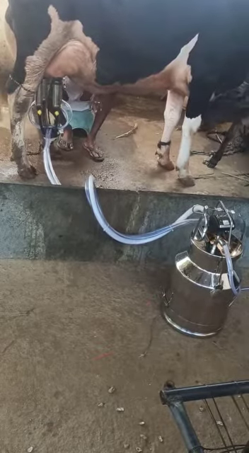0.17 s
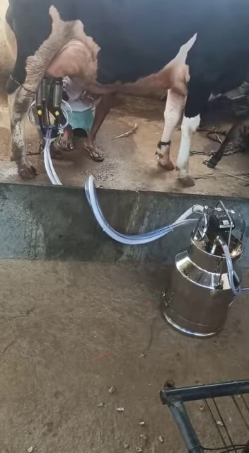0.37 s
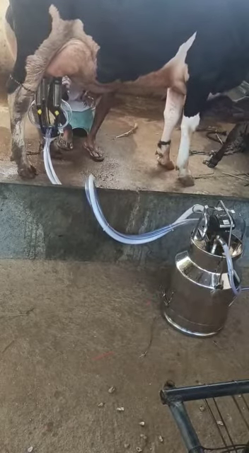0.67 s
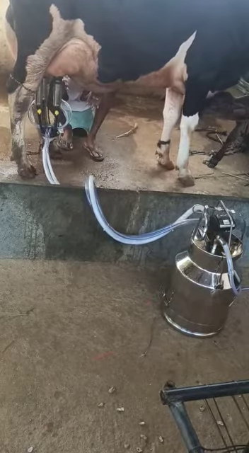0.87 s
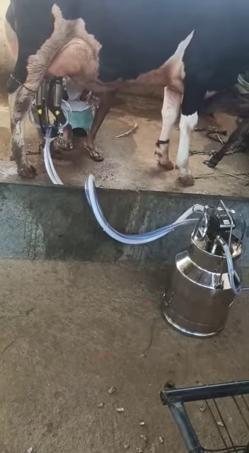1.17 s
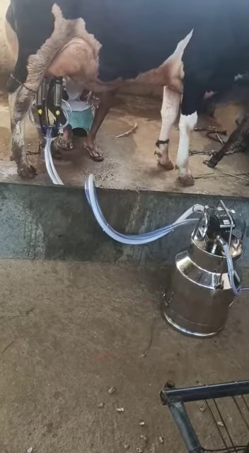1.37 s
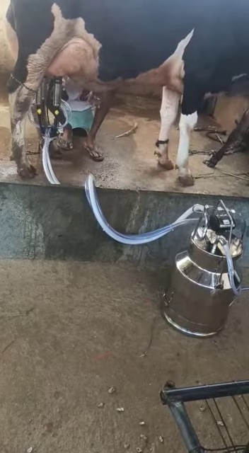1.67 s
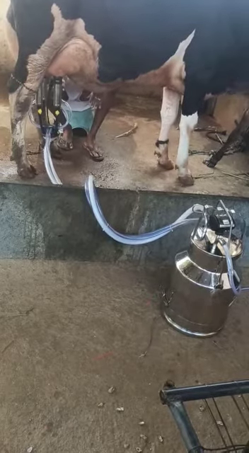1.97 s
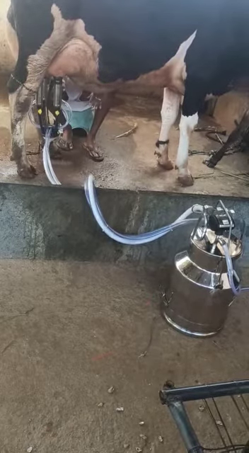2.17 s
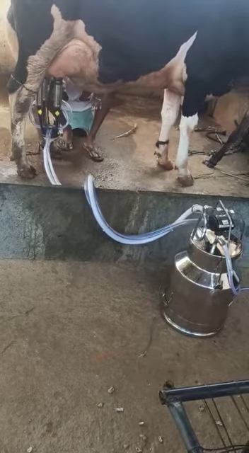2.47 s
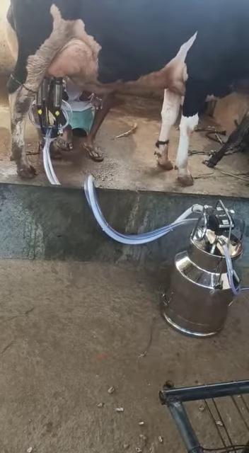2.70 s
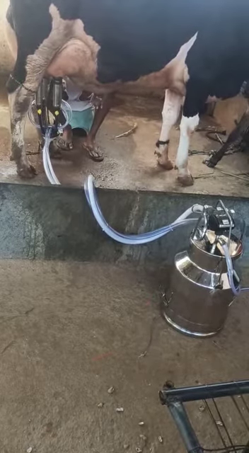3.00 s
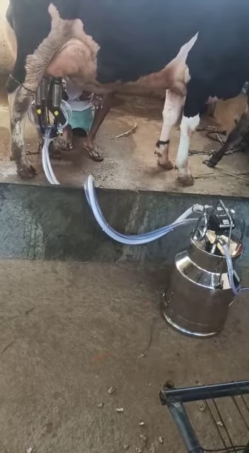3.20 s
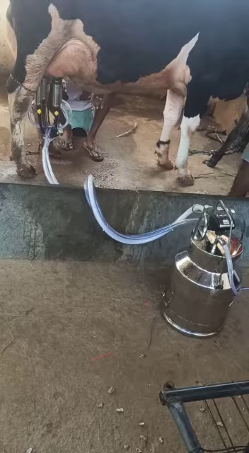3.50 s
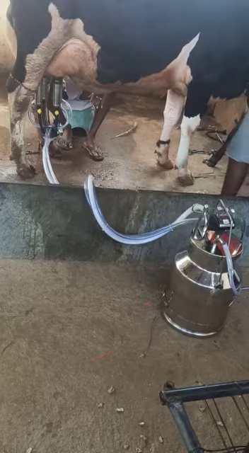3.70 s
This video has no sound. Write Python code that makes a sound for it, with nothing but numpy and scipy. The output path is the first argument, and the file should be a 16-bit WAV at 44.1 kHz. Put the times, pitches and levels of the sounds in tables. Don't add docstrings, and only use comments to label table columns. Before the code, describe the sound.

Milking machine running in a barn: droning pump, rushing air, sharp alternating clicks and soft air puffs.

```python
import sys
import numpy as np
from scipy import signal
from scipy.fft import rfft, irfft, next_fast_len
from scipy.io import wavfile
from scipy.ndimage import uniform_filter1d, map_coordinates

SR = 44100
rng = np.random.default_rng(int(sys.argv[2]) if len(sys.argv) > 2 else 0)


def ratio(d):
    e = np.asarray(d, float) / 20
    return 10 ** e


def wav_out(sig):
    wavfile.write(sys.argv[1], SR, np.round(np.clip(np.atleast_2d(sig).T, -1, 1) * 32767).astype(np.int16))


N = 169785

SHAFT_HZ = 47.537


def pump():
    # freq_hz, density_db
    rumble = [(25, -40), (70, -29), (95, -11), (230, -7.5), (310, -1.5), (480, -9), (600, -10.5),
              (1400, -16.5)]
    rush = [(600, -23), (1300, -22.5), (2060, 1), (2200, 0), (2500, 0.5), (4300, -3), (6300, -1.5),
            (6950, -6.5)]
    fizz = [(6800, -37), (7450, 10), (7900, 1), (8250, 9.5), (11900, 0.5), (13500, -4), (15500, -15)]
    rumble_db, rush_db, fizz_db = -35.5, -33.5, -37
    vane_depth, surge_db, surge_rate_hz = 0.047, 0.8, 5.86
    t = np.arange(N) / SR
    vane = 1 + vane_depth * np.cos(2 * np.pi * 4 * SHAFT_HZ * t)
    swing = np.interp(t * 200, np.arange(800), wobble(surge_rate_hz, count=1)[0])
    surge = ratio(surge_db * swing)
    out = tones() + ratio(rumble_db) * air(rumble, patchy_db=4.0, size=1)
    out += ratio(rush_db) * surge * vane * air(rush, patchy_db=1.4)
    return out + ratio(fizz_db) * surge * air(fizz, patchy_db=2.0)


def tones():
    # shaft_order, left_db, right_db, left_lead_rad
    strong_orders = [(4, -31.6, -31.3, 0), (8, -36, -42, -0.1), (10, -47, -46, -0.5), (11, -55, -60, 2.8),
                     (12, -43, -33, 2.4), (13, -62, -50, -1.4), (14, -55, -55, -0.2), (15, -70, -58, -0.6),
                     (16, -42, -44, 0.7), (17, -63, -57, -3.0), (20, -49, -52, 2.0), (28, -58, -49, -2.6),
                     (32, -54, -59, -2.0), (35, -56, -57, 0.1), (36, -54, -42, -2.3), (38, -59, -57, 2.3),
                     (40, -65, -53, 1.5), (42, -61, -51, 1.9), (43, -59, -53, -2.2), (44, -48, -54, -0.2),
                     (48, -54, -51, 1.1), (52, -54, -55, -1.8), (56, -51, -45, 2.5),
                     (65, -51, -56, 0.3), (75, -53, -61, 0.8), (80, -52, -48, 0.9), (81, -54, -56, 2.5),
                     (82, -52, -59, -0.9), (84, -45, -54, 2.6), (86, -52, -49, -0.3), (88, -52, -53, 2.2),
                     (89, -45, -49, -0.2), (91, -50, -49, 1.1), (92, -47, -46, -0.9), (93, -69, -52, -0.7),
                     (97, -51, -53, 1.4), (99, -58, -53, 0.8), (100, -41, -45, -0.9), (104, -55, -52, 1.3),
                     (105, -53, -54, -1.0), (106, -53, -55, 0.7), (108, -54, -51, 2.5),
                     (111, -45, -51, -1.8), (112, -51, -54, 2.8),
                     (55, -58, -57, .8), (58, -57, -55, -1.3), (60, -57, -55, -.2), (113, -55, -53, 1.0),
                   (115, -55, -51, -.6), (116, -54, -55, .5), (117, -49, -51, 1.9), (118, -55, -59, .3),
                   (120, -59, -54, -1.2), (121, -51, -65, 2.2), (123, -55, -70, 2.0), (132, -51, -62, 3.0),
                   (141, -63, -55, -.5), (152, -53, -54, .4), (153, -54, -61, -2.0), (154, -58, -52, .9),
                   (157, -54, -59, -.7), (158, -50, -53, .1), (159, -55, -64, 3.0), (161, -48, -55, 1.9),
                   (171, -53, -57, .6), (172, -51, -52, -.3), (175, -60, -53, 2.7), (176, -55, -51, 2.5),
                   (177, -58, -53, -1.6)]
    # freq_hz, left_db, right_db, left_lead_rad
    whines = [(1149.4, -58, -57, -0.1), (1839, -60, -60, -2.3), (2398, -63, -57, -3.1),
              (1608.9, -56.0, -59.0, -0.3), (2069.2, -55.0, -72.0, 2.5), (2298.7, -50.0, -54.0, -2.3),
              (2528.8, -47.0, -41.0, -2.7), (2988.4, -60.0, -45.0, 0.7), (3132.4, -46.0, -49.0, 0.2),
              (3218.5, -47.0, -49.0, -0.1), (3362.5, -56.0, -52.0, -0.5), (3448.7, -49.0, -49.0, -0.5),
              (3678.1, -60.0, -54.0, -0.4), (4283.1, -63.0, -49.0, -0.5), (4616.2, -53.0, -51.0, 0.6),
              (6015.8, -55.0, -60.0, -0.8), (8276.2, -62.0, -50.0, -1.5)]
    # freq_hz, level_db
    weak_orders = [(90, -97), (900, -62), (2500, -69), (4000, -51), (5700, -59), (6700, -55), (7500, -65.5),
                   (8300, -67.5)]
    scatter_db, sway_db, sway_rad_per_order = 4, 1.1, 0.003

    strong = strong_orders
    named = [(order * SHAFT_HZ, *rest) for order, *rest in strong]
    weak_hz = np.setdiff1d(np.arange(2, 184), [row[0] for row in strong]) * SHAFT_HZ
    scatter = np.minimum(rng.standard_normal((len(weak_hz), 2)), 0.5)
    weak_db = (along(weak_orders, weak_hz) + dips(weak_hz))[:, None] + scatter_db * scatter
    weak = np.c_[weak_hz, weak_db, rng.uniform(-np.pi, np.pi, len(weak_hz))]
    hz, left_db, right_db, lead_rad = np.vstack([named, whines, weak]).T[:, :, None]

    t = np.arange(800) / 200
    bins = np.round(hz * 4).astype(int)
    start_rad = rng.uniform(0, 2 * np.pi, hz.shape) * (hz > 400)
    drift = wobble(3.02, count=1) + 1.2 * wobble(3.99, count=len(hz))
    phase = start_rad + sway_rad_per_order * hz / SHAFT_HZ * drift
    phase = phase + 2 * np.pi * (hz - bins / 4) * t
    level = ratio(sway_db * np.clip(hz / 1500 - 0.2, 0, 1) * wobble(6.68, count=len(hz)))
    slow = level * np.exp(1j * phase) * signal.windows.tukey(800, 0.03)

    skirts = np.fft.fft(slow) / 800 * SR * 2 * np.sqrt(2)
    where = np.abs(bins + np.fft.fftfreq(800, 1 / 800).astype(int))
    out = np.zeros((2, 2 * SR + 1), complex)
    np.add.at(out[0], where, ratio(left_db) * np.exp(1j * lead_rad) * skirts)
    np.add.at(out[1], where, ratio(right_db) * skirts)
    return irfft(out)[:, SR // 16:][:, :N]


def slide():
    # start_s, peak_db
    clicks = [
        (0.3217, -8.5),
        (0.9569, -6.5),
        (1.473, -8),
        (2.0972, -6.5),
        (2.614, -8),
        (3.2493, -6),
        (3.7653, -7.5),
    ]
    # freq_hz, density_db
    hiss_spectrum = [(900, -22), (1300, -7), (2200, -4), (3000, 4), (4500, -8), (5300, -8), (6600, 1.5),
                     (7800, -6), (14000, -23)]
    travel_s, slide_db, low_cut_hz = 0.0005, -2, 455
    hiss_db, hiss_rise_s, hiss_t60_s = (-19.5, -19), 0.0022, 0.3
    out, hiss = np.zeros((2, N + SR)), np.zeros(N + SR)
    t = np.arange(SR // 4) / SR
    for k, (start_s, peak_db) in enumerate(clicks):
        side = k % 2
        at = round((start_s + travel_s) * SR)
        sound = throw(side)
        out[:, at:at + sound.shape[1]] += ratio(peak_db + slide_db) * sound
        decay = ratio(peak_db + hiss_db[side] - 60 * t / hiss_t60_s)
        hiss[at:at + len(t)] = decay * (1 - np.exp(-t / hiss_rise_s))
    knocking = filtered(out[:, :N], lambda hz: (1j * hz / (low_cut_hz + 1j * hz)) ** 2)
    return knocking + hiss[:N] * air(hiss_spectrum, patchy_db=0.5)


def throw(side):
    # freq_hz, t60_s, left_db, right_db
    body_modes = [
        [(2650, 0.0083, -10.5, -10), (3256, 0.0056, 0.5, -3.5), (4040, 0.0092, -2, -0.5),
         (4530, 0.0034, -26, 1), (6120, 0.0033, -3.5, -3), (6850, 0.0049, -15.5, -5.5),
         (7430, 0.0054, -14, -10), (8500, 0.0053, -15, -4), (13460, 0.0037, -28, -8)],
        [(2170, 0.0067, -16, -6), (3220, 0.006, -11, -13), (3820, 0.0066, -5, -14), (4620, 0.0073, -4.5, -3),
         (5500, 0.0059, -9, -7), (6600, 0.0056, -14, -1), (7500, 0.0055, -16, -13), (8200, 0.0045, -20, -7)],
    ]
    # freq_hz, t60_s, left_db, right_db
    lid_modes = [
        [(934, 0.037, -11, -7.5), (1106, 0.034, -17, -13)],
        [(871, 0.069, -12.5, -24), (1068, 0.039, -7, -8.5)],
    ]
    # delay_s, left_db, right_db
    echoes = [
        [(.0017, -22, -4.5), (.0033, 2.5, -8), (.007, -9, -16), (.0115, -20, -9)],
        [(.0017, -15, -16), (.0037, -6, -2), (.006, -10, -15), (.0107, -9, -14)],
    ]
    body_rise_s = [0.00016, 0.0004]
    # freq_hz, t60_s
    barn = [(1000, 0.2), (3500, 0.3), (8000, 0.11)]
    crack_db, crack_t60_s, knock_rise_s = -13, 0.0055, 0.0017
    knock_wet_db, barn_db = -2, -6
    t = np.arange(SR // 10) / SR
    crack = np.diff(rng.standard_normal((2, len(t) + 1)))
    ring = rings(body_modes[side], body_rise_s[side], t) + ratio(crack_db - 60 * t / crack_t60_s) * crack
    knock = rings(lid_modes[side], knock_rise_s, t)
    near = ring + knock
    for delay_s, left_db, right_db in echoes[side]:
        near = near + ratio([[left_db], [right_db]]) * np.roll(ring, round(delay_s * SR), axis=1)

    hz, frame_s, z = signal.stft(rng.standard_normal((2, SR // 2)), SR, nperseg=256)
    tail = signal.istft(z * ratio(-60 * frame_s / along(barn, hz)[:, None]), SR, nperseg=256)[1]
    sent = np.pad(ring + ratio(knock_wet_db) * knock, ((0, 0), (250, 0)))
    wet = signal.fftconvolve(sent, tail / np.linalg.norm(tail[0]), axes=1)
    return ratio(barn_db) * wet + np.pad(near, ((0, 0), (0, wet.shape[1] - len(t))))


def rings(modes, rise_s, t):
    out = np.zeros((2, len(t)))
    for k, (hz, t60_s, left_db, right_db) in enumerate(modes):
        decay = ratio(np.array([[left_db], [right_db]]) - 60 * t / t60_s)
        out += (-1) ** k * decay * np.sin(2 * np.pi * hz * t) * (1 - np.exp(-t / rise_s))
    return out


def puffs():
    # peak_s, level_db
    puff_times = [
        (.13, -32.5),
        (.69, -31.5),
        (1.29, -31),
        (1.84, -32.5),
        (2.431, -32),
        (2.99, -30.5),
        (3.581, -30),
    ]
    # freq_hz, density_db
    jet = [(5000, -17), (6900, 4), (8300, -2), (11900, -4), (13500, -3), (15500, -9.5)]
    # freq_hz, density_db
    liners = [
        [(2500, -24), (3800, -6.5), (4200, 6), (4700, -4), (8500, -11)],
        [(1500, -21), (4300, 1), (8500, -3.5)],
    ]
    jet_fall_s, body_lag_s, body_fall_s, body_db = 0.071, 0.026, 0.047, 1
    out = swell(puff_times, 0, jet_fall_s) * air(jet, patchy_db=0.5)
    for k, spectrum in enumerate(liners):
        filling = swell(puff_times[k::2], body_lag_s, body_fall_s)
        out += ratio(body_db) * filling * air(spectrum, patchy_db=0.5)
    return out


def swell(rows, lag_s, fall_s):
    t, rise_s = np.arange(N) / SR, 0.021
    out = np.zeros(N)
    for peak_s, level_db in rows:
        after = t - peak_s - lag_s
        out += ratio(level_db) * np.exp(-(after / np.where(after < 0, rise_s, fall_s)) ** 2 / 2)
    return out


def air(spectrum, patchy_db, size=6):
    # freq_hz, correlation
    alike = [(30, 0.17), (120, 0.97), (300, 0.93), (600, 0.49), (1500, 0.31), (16000, 0.042)]
    # freq_hz, left_over_right_db
    lean = [(100, -1.5), (400, -0.5), (800, -4.5), (3000, 1.5), (8000, 0), (14000, -4.5)]
    z = signal.stft(rng.standard_normal((2, N)), nperseg=512)[2]
    field = uniform_filter1d(rng.standard_normal(z.shape[1:]), size=size, axis=0)
    field = uniform_filter1d(field, size=14, axis=1)
    pair = signal.istft(z * ratio(patchy_db * unit(field)), nperseg=512)[1][:, :N]

    def mid_side(hz):
        turn = np.arccos(np.clip(along(alike, hz), -1, 1)) / 2
        return ratio(along(spectrum, hz)) * np.array([np.cos(turn), np.sin(turn)])

    mid, side = filtered(pair, mid_side)
    stereo = np.array([mid + side, mid - side])
    return unit(filtered(stereo, lambda hz: ratio(np.outer([0.5, -0.5], along(lean, hz)) + dips(hz))))


def dips(hz):
    # centre_hz, width_hz, depth_db
    notches = [(2203, 42, -12.5), (2417, 43, -11), (2897, 49, -11.5), (6920, 89, -4), (7980, 90, -3)]
    return sum(db * np.exp(-((hz - centre_hz) / width_hz) ** 2) for centre_hz, width_hz, db in notches)


def unit(x):
    return x / np.sqrt(np.mean(x ** 2) + 1e-20)


def along(points, hz):
    f, v = np.transpose(points)
    return np.interp(np.log(hz + 1), np.log(f + 1), v)


def wobble(rate_hz, count):
    knots = rng.standard_normal((count, 64))
    position = np.arange(800) / 200 * rate_hz
    return map_coordinates(knots, np.meshgrid(np.arange(count), position, indexing="ij"))


def filtered(x, response):
    m = next_fast_len(N + SR // 2)
    return irfft(rfft(x, m) * response(np.fft.rfftfreq(m, 1 / SR)), m)[..., :N]


def glints(dry):
    # peak_s, low_hz, high_hz
    slivers = [(.69, 9050, 9650), (1.81, 10350, 11050), (2.41, 10300, 10500), (2.525, 10350, 10500),
               (2.975, 10300, 11050), (2.99, 9100, 9700), (3.405, 10350, 10500), (3.685, 10450, 10900),
               (3.78, 10450, 10900)]
    glint_s, glint_db = 0.012, -15.5
    t = np.arange(N) / SR
    out = np.zeros((2, N))
    for peak_s, low_hz, high_hz in slivers:
        gate = np.clip(3 - 3 * abs(t - peak_s) / glint_s / 1.5, 0, 1)
        out += gate * filtered(dry, lambda hz: (hz > low_hz) & (hz < high_hz))
    return ratio(glint_db) * out


def scene():
    return pump() + slide() + puffs()


def top_cut(x):
    return signal.sosfilt(signal.butter(12, 16180, fs=SR, output="sos"), x)


def record(dry):
    # freq_hz, gain_db
    treble_gaps = [(8450, 0), (8560, -9), (8850, -22), (8950, -70), (11560, -70), (11640, 0), (11950, 0),
                   (12600, -12), (13300, 0), (15480, 0), (15560, -70)]
    mix = filtered(dry, lambda hz: ratio(along(treble_gaps, hz))) + glints(dry)
    return top_cut(mix)


dry = scene()
out = record(dry)
wav_out(out)
```